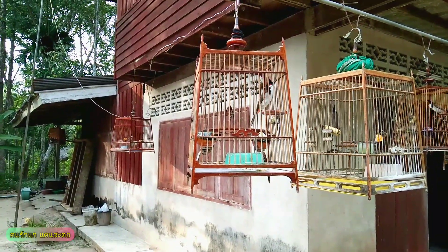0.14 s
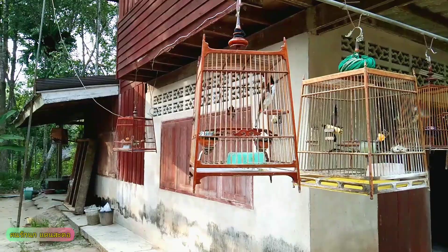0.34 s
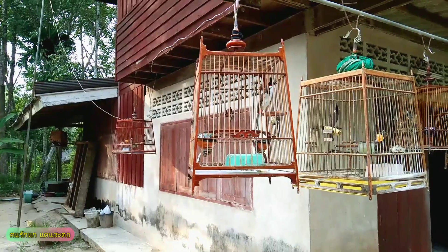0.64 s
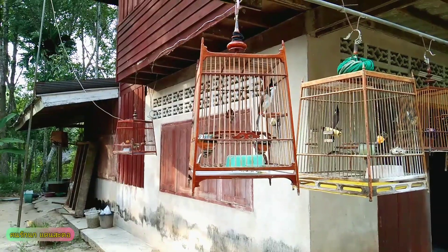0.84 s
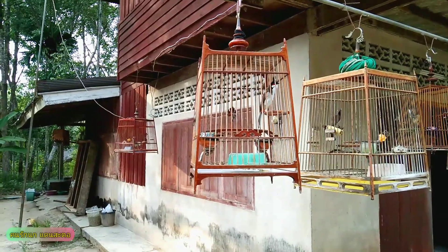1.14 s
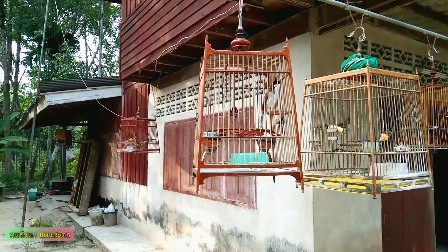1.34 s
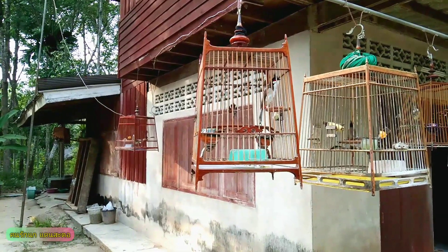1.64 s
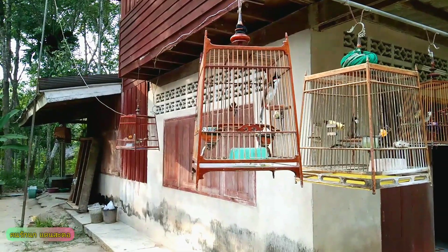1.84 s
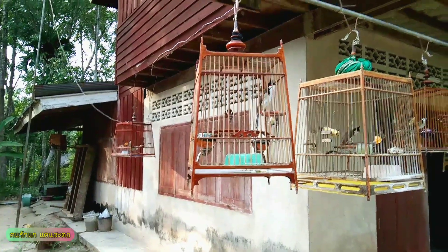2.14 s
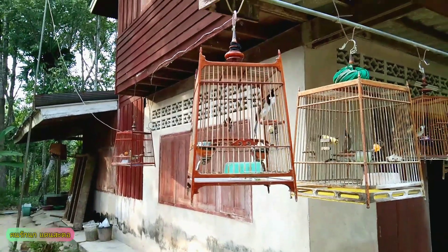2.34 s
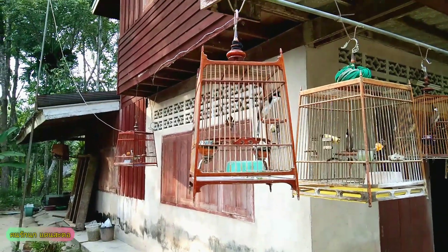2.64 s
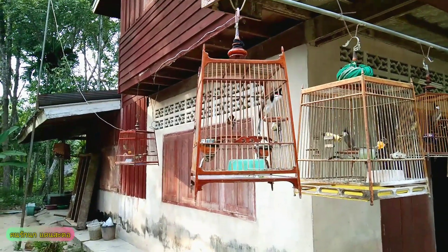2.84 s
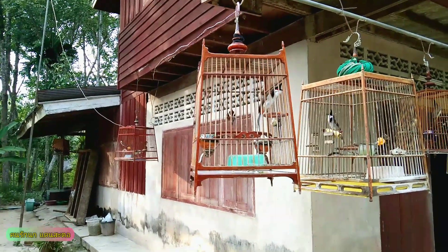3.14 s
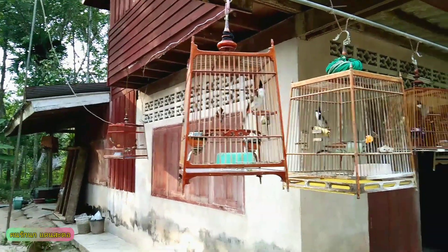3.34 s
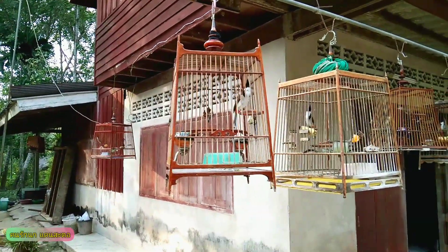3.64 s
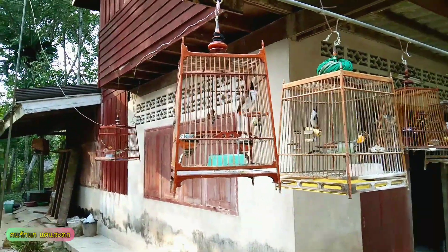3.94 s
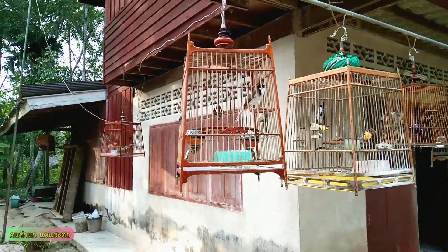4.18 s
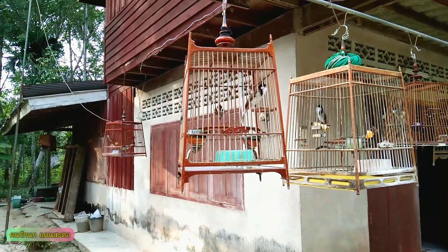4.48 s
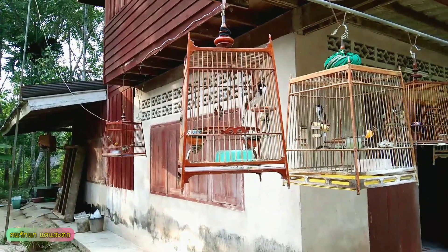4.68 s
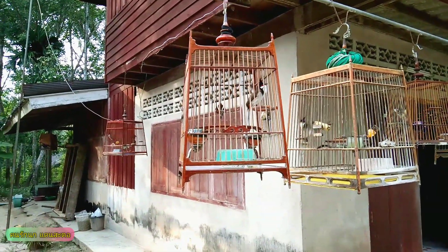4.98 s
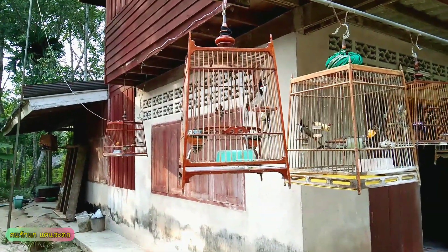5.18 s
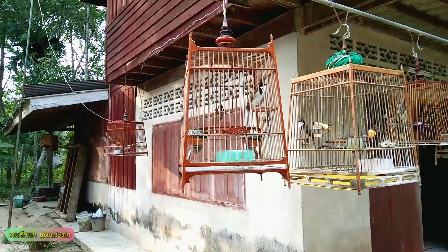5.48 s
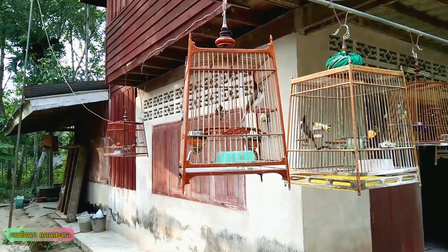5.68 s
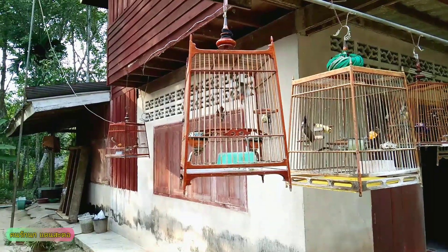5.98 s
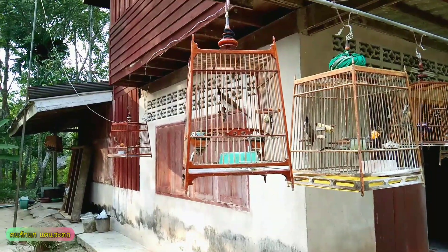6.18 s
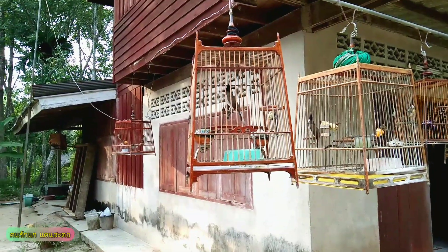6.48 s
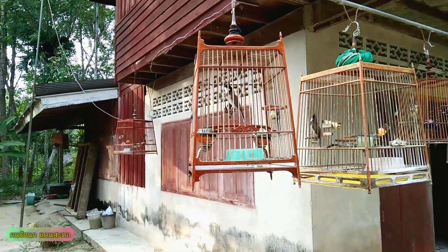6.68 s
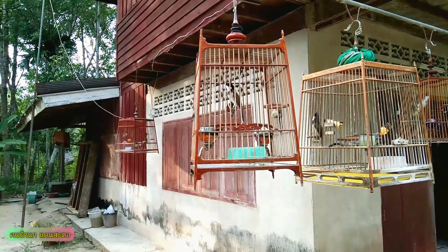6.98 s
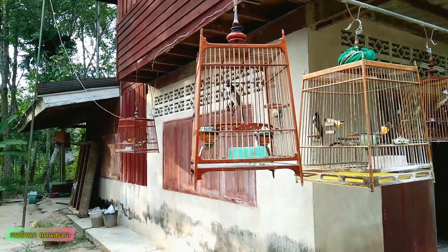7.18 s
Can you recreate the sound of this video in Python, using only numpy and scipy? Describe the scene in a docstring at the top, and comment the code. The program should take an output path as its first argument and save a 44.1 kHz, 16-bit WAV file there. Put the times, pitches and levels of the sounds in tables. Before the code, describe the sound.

Several caged bulbuls sing outdoors by a house wall, one close and others farther along. A quick opening burst gives way to sparse notes and thin high whistles from the trees, then dense bright warbling with hoarse squeaks. Beneath, a soft low rush like an approaching vehicle grows broader and hissier, passing closest near the end. Slightly distant microphone, short open-air reflections.

```python
"""Under the eaves of a village house, a broad rush like a vehicle drawing near swells from the start.
It is shaped noise: its low and mid parts follow its distance, its hiss a drawn level curve.
Caged bulbuls, one close and others farther along the wall, sing quick slurs and pips on bent pitches, at times
hoarse; then a thin whistler in the trees gives long, high slurs. Later the near bird squeaks: sweeps with a
strong second harmonic. Echoes and fading noise make the birds ring. Near the end the rush passes closest."""
import sys
import numpy as np
from scipy import signal
from scipy.fft import rfft, irfft
from scipy.io import wavfile
from scipy.ndimage import map_coordinates

SR = 44100
rng = np.random.default_rng(int(sys.argv[2]) if len(sys.argv) > 2 else 0)


def transcribe(u):
    """Save the signal u as a 16-bit wav file named by the first command-line argument.

    u: samples, shape (n,) or (channels, n), limited to [-1, 1]; the rate is SR.
    q: integer samples, one column per channel.
    """
    v = np.clip(np.atleast_2d(u).T, -1, 1)
    q = np.round(v * 32767).astype(np.int16)
    wavfile.write(sys.argv[1], SR, q)


N = 322812
TIME = np.arange(N) / SR   # seconds

# Noise colours of the rush, from its lowest part to its highest: pitch_hz, relative level_db (per Hz)
DRONE_COLOUR = [(25, -27), (38, -11), (50, -15.5), (72, -0.5), (125, 2.5), (160, -0.5)]
RUMBLE_COLOUR = [(150, 2), (205, 1.5), (260, -3), (340, -12.5)]
ROAR_COLOUR = [(300, -2.5), (500, -3.5), (760, -1), (1020, -5), (1220, -13.5), (1450, -22.5)]
HISS_NOISE_COLOUR = [(1300, 6), (1900, -6.5), (3300, 0), (3900, 1)]
SIZZLE_COLOUR = [(4000, 5), (5500, -1), (8200, -15), (10500, -19), (12500, -39.5)]
# The drone of the rush surges and eases on its way: time_s, change_db
DRONE_SURGE = [(0, 1.5), (.6, 1), (1.4, -0.5), (2.4, 4), (3.2, -3), (3.9, 4), (4.9, -0.5), (5.6, 5),
               (6.3, -3.5), (7.32, 0.5)]
# Level of the hiss in the rush: time_s, level_db
HISS_LEVEL = [(0, -58.5), (1.1, -81), (2.0, -60), (3.2, -54), (4.6, -46.5), (5.5, -48), (6.2, -44.5),
              (7.05, -43), (7.32, -45)]
# The low and mid rush passes along a straight line, then drops behind the house
PASS_S, CLOSEST_M, SPEED_M_PER_S = 6.763, 5.14, 11.6
HIDDEN_S, HIDDEN_DB_PER_S = 6.97, 4.5

# Rising and falling slurs: start_s, end_s, from_hz, to_hz, rasp_hz (depth), level_db,
# crest (0-1 along the note), far (0-1 from near cage to eaves)
RISING_SLURS = [(.033, .075, 2474, 3250, 105, -24.5, 0.52, 0.9), (.24, .275, 1900, 2890, 140, -42, 0.44, 1),
                (.275, .31, 1898, 1940, 150, -39, 0.65, .95), (.305, .352, 1825, 2510, 120, -29, 0.57, .95),
                (.352, .392, 3206, 3486, 114, -19, 0.57, 0.53), (.482, .51, 2814, 3170, 116, -20, .7, 0.72),
                (.568, .59, 2010, 2680, 24, -33.5, 0.6, .95), (.638, .69, 2080, 2267, 87, -29, .45, 0.7),
                (1.712, 1.762, 2005, 3170, 140, -25.5, 0.67, 0.62),
                (1.88, 1.99, 1860, 2090, 270, -46.5, 0.26, 1),
                (1.915, 1.995, 2810, 3060, 120, -35.5, 0.32, 1),
                (2.33, 2.44, 1790, 2150, 320, -41, 0.62, 1), (2.487, 2.6, 2344, 3324, 320, -28, 0.17, 1),
                (2.872, 2.928, 3036, 3047, 120, -23, 0.38, 0.7),
                (2.985, 3.085, 1860, 3410, 330, -29, 0.52, 1),
                (3.245, 3.275, 2040, 2660, 150, -28.5, 0.6, 0.6),
                (3.278, 3.298, 2883, 2910, 96, -22.5, 0.75, 0.72),
                (3.347, 3.378, 2090, 2665, 77, -20.5, 0.57, 0.27),
                (3.376, 3.435, 2910, 3424, 240, -15.5, 0.36, 0.82),
                (3.5, 3.545, 2800, 3320, 123, -22.5, 0.63, 1), (3.715, 3.77, 2660, 3454, 290, -23, 0.56, 1),
                (3.772, 3.812, 1530, 2576, 140, -20.5, 0.82, 0),
                (3.808, 3.868, 2834, 3470, 265, -14.5, 0.59, 0.78),
                (3.935, 3.962, 1520, 2530, 130, -25.5, 0.77, .1),
                (3.96, 3.992, 2684, 3476, 92, -15.5, 0.53, 0.07),
                (4.095, 4.115, 2965, 3670, 190, -23, 0.18, 1),
                (4.138, 4.182, 1464, 2150, 28, -30.5, 0.68, 0),
                (4.212, 4.248, 2960, 3300, 30, -23, 0.38, 0),
                (4.285, 4.345, 1847, 2460, 123, -25.5, 0.65, 0.4),
                (4.468, 4.51, 2140, 2655, 240, -27.5, 0.15, 0.7),
                (4.83, 4.885, 2765, 3570, 228, -20.5, 0.66, 1),
                (4.884, 4.914, 3445, 3670, 42, -15.5, 0.66, 0.13),
                (5.222, 5.238, 3390, 4090, 22, -34.5, .5, 0), (5.238, 5.285, 2380, 2720, 20, -40, 0.48, .1),
                (5.303, 5.39, 2810, 3744, 160, -16.5, 0.34, 0.94),
                (5.542, 5.572, 2350, 2370, 6.8, -31.5, 0.6, 0),
                (5.568, 5.61, 2484, 3440, 204, -18, 0.56, 0.76),
                (5.78, 5.852, 2410, 3384, 134, -16, 0.6, 0.83),
                (6.103, 6.13, 1690, 2313, 13, -23, 0.9, 0.13), (6.128, 6.15, 2730, 4260, 34, -26.5, 0.1, 0),
                (6.152, 6.198, 3240, 3564, 100, -20.5, 0.24, 0.98),
                (6.43, 6.495, 3124, 3834, 193, -20, 0.44, 0.7),
                (6.912, 6.942, 2600, 3190, 30, -36, .7, .95), (7.0, 7.06, 3270, 3556, 105, -31, 0.6, 1)]
FALLING_SLURS = [(.466, .484, 3980, 3480, 60, -34, .5, .1), (.588, .632, 3680, 2600, 210, -23, 0.31, 0.8),
                 (1.42, 1.485, 2130, 1883, 81, -37.5, 0.21, 0.35),
                 (1.484, 1.502, 3580, 2300, 130, -40, 0.3, 0.6),
                 (2.255, 2.32, 3136, 2910, 290, -32.5, 0.59, 1),
                 (2.488, 2.58, 2537, 2040, 160, -31, 0.01, 0), (3.07, 3.13, 2056, 1716, 16, -38, 0.47, 0.4),
                 (3.66, 3.705, 2060, 1965, 20, -35.5, 0.33, 0.2),
                 (4.028, 4.058, 2790, 2455, 49, -18, .7, 0.24),
                 (4.056, 4.102, 3180, 2787, 93, -20.5, .45, 0.07),
                 (4.06, 4.092, 2330, 2310, 220, -25, 0.26, 0.6),
                 (4.343, 4.366, 2637, 2325, 20, -24.5, 0.54, 0.2),
                 (5.163, 5.176, 3220, 2280, 18, -41, 0.2, 0),
                 (5.61, 5.68, 3176, 2023, 73, -24.5, 0.17, 0.9),
                 (6.036, 6.068, 3780, 2876, 70, -20, 0.65, 0), (6.218, 6.26, 3000, 2480, 10, -28, 0.64, 0),
                 (6.305, 6.35, 2290, 1910, 120, -35.5, 0.46, 1),
                 (6.945, 6.998, 2815, 2610, 58, -33, 0.3, 1)]
# A slur moves fast at first and settles on its last pitch; the higher the bend, the sooner
RISE_BEND, FALL_BEND = 1.7, 2.3
# A note swells to one crest and fades: loss half a note's length before and after it
ATTACK_DB, RELEASE_DB = 8, 5.5
# How well a harmonic gets out of the throat: harmonic_hz, relative level_db
THROAT_FILTER = [(3000, 19.5), (3500, -12.5), (4200, -24), (5000, -26), (6500, -42.5), (8400, -47.5),
                 (10700, -37.5), (12200, -51.5), (14000, -65.5)]
BLOOM_HZ, BLOOM_DB_PER_KHZ = 3300, 5   # overtones weaken on notes below this pitch
# Softer notes are purer: dB of overtones lost per dB below full voice
FULL_VOICE_DB, PURITY = -21, 0.28

# Clear pips of the near bird, rising to a top and sinking back:
# start_s, end_s, top_hz, height_hz (of the arch), level_db
CLEAR_PIPS = [(0.083, 0.14, 1647, 70, -44.5), (0.525, 0.582, 1644, 110, -50), (0.953, 1.078, 2750, 16, -77),
              (1.182, 1.27, 2220, 52, -78), (1.362, 1.412, 1540, 48, -49), (2.037, 2.102, 3014, 50, -42.5),
              (2.073, 2.123, 1630, 160, -53), (2.159, 2.235, 2494, 51, -45), (2.458, 2.489, 2960, 490, -28),
              (2.717, 2.75, 1630, 140, -51), (2.78, 2.86, 2247, 68, -36.5), (2.905, 2.929, 1617, 210, -45),
              (3.616, 3.634, 2530, 490, -21.5), (3.635, 3.658, 2554, 510, -22),
              (3.93, 3.96, 3044, 155, -21), (4.188, 4.193, 2510, 300, -18),
              (4.195, 4.209, 2430, 350, -19.5), (4.203, 4.26, 1934, 37, -31.5),
              (4.408, 4.457, 1820, 200, -38.5), (5.037, 5.09, 1690, 180, -39),
              (5.082, 5.119, 2234, 365, -23), (5.128, 5.162, 2236, 350, -28),
              (6.251, 6.285, 2834, 230, -26.5)]
PIP_RASP_HZ, PIP_CREST = 14, 0.49

# Hoarse, toneless stretches of the song: start_s, end_s, level_db
HOARSE_STRETCHES = [(0.338, 0.387, -42.5), (0.455, 0.525, -48.5), (2.5, 2.598, -57), (4.333, 4.417, -35.5),
                    (4.477, 4.563, -33), (4.652, 4.738, -39), (4.809, 4.894, -38.5), (4.954, 5.141, -40.5),
                    (5.23, 5.407, -42.5)]
# Colour of the hoarse noise: pitch_hz, relative level_db (per Hz)
HOARSE_NOISE_COLOUR = [(2000, 3), (3000, 16.5), (4300, 7), (6000, -7), (7800, -22), (11000, -10),
                       (13500, -17.5)]

# Slurs of the thin whistler: start_s, end_s, from_hz, to_hz, bend (no unit), level_db, crest (0-1)
TREE_SLURS = [(0.758, 1.422, 6050, 4720, 2.5, -59.5, 0.81), (1.294, 1.358, 3940, 3700, 2.1, -60, 0.1),
              (1.473, 1.968, 6130, 5073, 3.3, -53.5, 0.72), (1.593, 1.718, 4080, 3540, 1.3, -50.5, 0.56),
              (1.943, 2.081, 4510, 6490, 1.1, -54.5, 0.27), (2.082, 2.154, 6650, 5240, .7, -61.5, 0.73),
              (2.202, 2.349, 5750, 5320, 2.9, -60.5, 0.87)]
TREE_RASP_HZ, TREE_FLICKER_DB = 30, 4

# Squeaks of the near bird: start_s, end_s, pitch_ratio (no unit), level_db
SQUEAK_NOTES = [(4.339, 4.414, 1.01, -26.5), (4.479, 4.564, 1.02, -25), (4.656, 4.733, .995, -25),
                (4.853, 4.901, 1.22, -28.5)]
# The upward sweep that all squeaks share, at even steps before the pitch ratio: pitch_hz
SQUEAK_PATH = (1618, 2082, 2670, 3140, 3000)
# The throat's resonance in a squeak: second_harmonic_hz, relative level_db
SQUEAK_THROAT = [(3000, -7), (4100, 8), (4900, -1.5), (5600, -5), (6300, -26)]
SQUEAK_RASP_HZ, SQUEAK_SWELL_DB = 70, 21   # all but the second harmonic grows by this along the sweep

# Reflections from cage, wall and roof, for the near cage and under the eaves: delay_s, level_db
NEAR_REFLECTIONS = [(.0034, -17), (.0095, -9), (0.016, -20.5)]
EAVES_REFLECTIONS = [(.0042, -5), (0.0096, -8.5), (0.0148, -7.5), (0.025, -21)]


def from_db(db):
    """Turn decibels into gain."""
    return 10 ** (np.asarray(db) / 20)


def rms_one(x):
    """Scale to unit power."""
    return x / np.sqrt(np.mean(x ** 2) + 1e-20)


def in_time(rows):
    """Draw straight lines between the points of a curve, with a value at every sample."""
    seconds, values = np.transpose(rows)
    return np.interp(TIME, seconds, values)


def at_hz(points, hz):
    """Read a spectrum on a log-frequency axis, as pitch is heard."""
    point_hz, level_db = np.transpose(points)
    return np.interp(np.log(np.maximum(hz, 1)), np.log(point_hz), level_db)


def coloured(spectrum):
    """Make noise of unit power with the given spectrum, falling steeply beyond its ends."""
    hz = np.arange(N // 2 + 1) * SR / N
    low_skirt = 1 / (1 + (spectrum[0][0] / (hz + 1)) ** 6)
    high_skirt = 1 / (1 + (hz / spectrum[-1][0]) ** 12)
    white = rfft(rng.standard_normal(N))
    return rms_one(irfft(white * from_db(at_hz(spectrum, hz)) * low_skirt * high_skirt, N))


def wander(t, rate):
    """Join random points, `rate` of them a second, into an unsteady line around zero."""
    knots = rng.standard_normal(2048)
    return np.interp((t - t[0]) * rate, np.arange(len(knots)), knots)


def passing(closest_db, spreading):
    """Gain of one part of the rush: it falls with distance, and behind the house."""
    metres = np.hypot(CLOSEST_M, SPEED_M_PER_S * (TIME - PASS_S))
    hidden_db = HIDDEN_DB_PER_S * np.maximum(TIME - HIDDEN_S, 0)
    return from_db(closest_db - hidden_db) * (CLOSEST_M / metres) ** spreading


def rush(flicker_db=1.32, sizzle_db=-51, sizzle_lag=2.38, rumble_share=0.56):
    """A low drone, rumble and mid roar, a hiss, and a sizzle that sinks faster than the hiss."""
    surge_db = in_time(DRONE_SURGE)
    hiss_db = in_time(HISS_LEVEL)
    drone = passing(closest_db=-42.5, spreading=0.54) * from_db(surge_db) * coloured(DRONE_COLOUR)
    # the rumble follows only a share of the drone's surges
    rumble_gain = passing(closest_db=-34.5, spreading=1.0) * from_db(rumble_share * surge_db)
    rumble = rumble_gain * coloured(RUMBLE_COLOUR)
    roar = passing(closest_db=-30.5, spreading=1.075) * coloured(ROAR_COLOUR)
    hiss = from_db(hiss_db) * coloured(HISS_NOISE_COLOUR)
    # the sizzle drops further than the hiss does when both are soft
    sizzle_gain = from_db(sizzle_db + sizzle_lag * (hiss_db - hiss_db.max()))
    sizzle = sizzle_gain * coloured(SIZZLE_COLOUR)
    flicker = from_db(flicker_db * wander(TIME, 18))
    return drone + rumble + (roar + hiss + sizzle) * flicker


def syrinx(start, end, path, rasp_hz, flutter_hz=135, jitter=0.023, rasp_noise=0.9, edge_s=.004,
           first_rasp=0.29):
    """A bird's voice organ: a flutter of its membrane builds up, shakes pitch and loudness, and rasps."""
    at = np.arange(int((start - edge_s / 2) * SR), min(N, int((end + edge_s / 2) * SR)))
    t = at / SR
    u = np.clip((t - start) / (end - start), 0, 1)   # progress along the note
    depth_hz = rasp_hz * np.interp(u, [.2, .7], [first_rasp, 1])
    flutter_rate = flutter_hz * (1 + 0.15 * wander(t, 52.1))
    flutter = np.sin(2 * np.pi * np.cumsum(flutter_rate) / SR)
    rasp = depth_hz * (flutter + rasp_noise * wander(t, 479.8))
    hz = path(u) * (1 + jitter * wander(t, 397.8)) + rasp
    phase = 2 * np.pi * np.cumsum(hz) / SR
    # soft edges keep the note from clicking
    edge = np.clip(np.minimum(t - t[0], t[-1] - t) / edge_s, 0, 1)
    gate = np.sin(np.pi / 2 * edge) ** 2
    throb = from_db(np.minimum(depth_hz / 50, 4) * flutter)
    return at, u, hz, phase, np.sqrt(2) * gate * rms_one(throb)


def harmonics(at, hz, phase, ranks, blur=0.14):
    """Overtones shaped by the throat; uneven cycles blur the higher ones."""
    shake = blur * wander(at / SR, 1900)
    total = np.zeros(len(at))
    for k in ranks:
        gain = from_db(at_hz(THROAT_FILTER, k * hz)) * (k * hz < SR / 2)
        total += gain * np.sin(k * phase + (k - 1) * shake)
    return total


def arc(u, crest):
    """Gain along a note: it swells to its crest and fades."""
    loss_db = np.where(u < crest, ATTACK_DB, RELEASE_DB)
    return from_db(-loss_db * (2 * (u - crest)) ** 2)


def slur(from_hz, to_hz, bend):
    """A pitch path that settles on its last pitch."""
    return lambda u: to_hz + (from_hz - to_hz) * (1 - u) ** bend


def arch(top_hz, height_hz):
    """A pitch path that rises to a top and sinks back."""
    return lambda u: top_hz - height_hz * (2 * u - 1) ** 2


def whistle(start, end, path, rasp_hz, level_db, crest, brassiness=1.3, waver_db=3.23):
    """A slightly wavering note whose harmonics bloom where it is loud and high."""
    at, u, hz, phase, gate = syrinx(start, end, path, rasp_hz)
    force = arc(u, crest)
    low_pitch_db = BLOOM_DB_PER_KHZ * np.minimum(path(u) - BLOOM_HZ, 0) / 1000
    soft_voice_db = PURITY * min(level_db - FULL_VOICE_DB, 0)
    bloom = force ** brassiness * from_db(low_pitch_db + soft_voice_db)
    gain = from_db(level_db + waver_db * wander(at / SR, 130)) * gate * force
    overtones = harmonics(at, hz, phase, range(2, 5))
    return at, gain * (np.sin(phase) + bloom * overtones)


def song():
    """The bulbuls' slurs and pips, whistled on bent pitches and shared between near cage and eaves."""
    near, eaves = np.zeros((2, N))
    for notes, bend in ((RISING_SLURS, RISE_BEND), (FALLING_SLURS, FALL_BEND)):
        for start, end, from_hz, to_hz, rasp_hz, level_db, crest, far in notes:
            at, note = whistle(start, end, slur(from_hz, to_hz, bend), rasp_hz, level_db, crest)
            near[at] += (1 - far) * note
            eaves[at] += far * note
    for start, end, top_hz, height_hz, level_db in CLEAR_PIPS:
        at, note = whistle(start, end, arch(top_hz, height_hz), PIP_RASP_HZ, level_db, PIP_CREST)
        near[at] += note
    return near, eaves


def hoarseness(rough_db=3.7):
    """Under strain the syrinx goes chaotic and adds a grainy noise."""
    strain = np.zeros(N)
    for start, end, level_db in HOARSE_STRETCHES:
        swell = np.interp(TIME, [start, start + 0.032, end - .01, end], [0, 1, 1, 0])
        strain += from_db(level_db) * swell
    grain = from_db(rough_db * wander(TIME, 250))
    return strain * coloured(HOARSE_NOISE_COLOUR) * grain


def tree_whistler():
    """Long, high slurs without overtones that flicker on their way from the trees."""
    out = np.zeros(N)
    for start, end, from_hz, to_hz, bend, level_db, crest in TREE_SLURS:
        path = slur(from_hz, to_hz, bend)
        at, u, hz, phase, gate = syrinx(start, end, path, TREE_RASP_HZ, jitter=0.0054)
        out[at] += from_db(level_db) * gate * arc(u, crest) * np.sin(phase)
    return out * from_db(TREE_FLICKER_DB * wander(TIME, 30))


def glide(u, steps):
    """A smooth path through evenly spaced values, for u from 0 to 1."""
    position = np.clip(u, 0, 1) * (len(steps) - 1)
    return map_coordinates(np.array(steps, float), [position], order=2, mode="nearest")


def squeaks(overtone_db=12, unsteady=0.38, halving_db=-9, grain_db=4.5):
    """Forced upward sweeps whose second harmonic leads while it crosses the throat's resonance."""
    out = np.zeros(N)
    for start, end, ratio, level_db in SQUEAK_NOTES:
        at, u, hz, phase, gate = syrinx(start, end, lambda u: ratio * glide(u, SQUEAK_PATH), SQUEAK_RASP_HZ)
        t = at / SR
        phase = phase + unsteady * wander(t, 900)
        tone = np.sin(phase) + from_db(overtone_db) * harmonics(at, hz, phase, range(3, 6))
        # the strained membrane slips in and out of period doubling: a broken strand between the harmonics
        tone += from_db(halving_db) * wander(t, 900) * np.sin(1.5 * phase)
        grain = rms_one(from_db(grain_db * wander(t, 347)))
        second = from_db(at_hz(SQUEAK_THROAT, 2 * hz)) * np.sin(2 * phase)
        swell = from_db(-SQUEAK_SWELL_DB * (1 - u) ** 2)
        out[at] += from_db(level_db) * gate * grain * (swell * tone + second)
    return out


def yard(x, echoes, tail_db, t60, late_db, late_t60=0.69, build_s=0.0088, late_cut_hz=3400,
         beamed_db=6, beamed_hz=5000):
    """Any hard reflections given, a diffuse ring and a longer, dull tail from the trees."""
    t = np.arange(SR) / SR
    ring, late = rng.standard_normal((2, SR)) * (1 - np.exp(-(t / build_s) ** 2))
    # treble is beamed where the beak points, so more of it arrives by reflection
    treble = signal.sosfilt(signal.butter(3, beamed_hz, "high", fs=SR, output="sos"), late)
    ring = ring + from_db(beamed_db) * treble
    late = signal.sosfilt(signal.butter(6, late_cut_hz, fs=SR, output="sos"), late)
    response = np.zeros(SR)
    for noise, level_db, decay_s in ((ring, tail_db, t60), (late, late_db, late_t60)):
        fade = np.exp(-np.log(1000) * t / decay_s)   # 60 dB down after decay_s
        response += from_db(level_db) * noise * fade / np.sqrt(np.sum(fade ** 2))
    response[0] += 1   # the direct sound
    for delay_s, level_db in echoes:
        response[int(delay_s * SR)] += from_db(level_db)
    return signal.fftconvolve(x, response)[:N]


def birds(near_db=-0.5, squeak_db=-4.5, eaves_db=-6.0, tree_db=-6):
    """Near birds ring least, eaves birds most; the tree whistler has a diffuse tail without distinct echoes."""
    near_song, eaves_song = song()
    near = from_db(near_db) * near_song + hoarseness() + from_db(squeak_db) * squeaks()
    near = yard(near, NEAR_REFLECTIONS, tail_db=-7.5, t60=0.34, late_db=-32.5)
    eaves = yard(eaves_song, EAVES_REFLECTIONS, tail_db=-1.5, t60=0.41, late_db=-8)
    trees = yard(tree_whistler(), [], tail_db=-3.0, t60=0.45, late_db=-19)
    return near + from_db(eaves_db) * eaves + from_db(tree_db) * trees


def scene():
    """Birds over the rush and a trace of steady hiss."""
    steady_hiss = 0.5 * from_db(-98.5) * rng.standard_normal(N)
    return (rush() + birds() + steady_hiss)[None]


def record(dry, mic_top_hz=13000, cutoff_hz=15500):
    """The microphone fades out in the high treble; the top is cut steeply."""
    dull = signal.sosfilt(signal.butter(6, mic_top_hz, fs=SR, output="sos"), dry)
    return signal.sosfilt(signal.ellip(10, .1, 80, cutoff_hz, fs=SR, output="sos"), dull)


dry = scene()
out = record(dry)
transcribe(out)
```